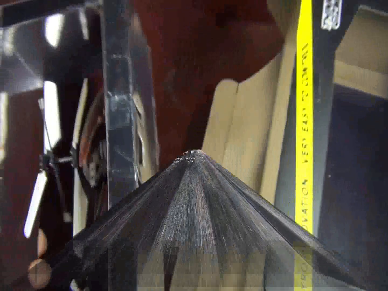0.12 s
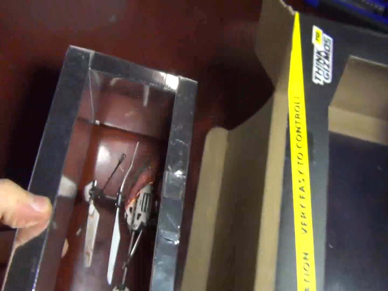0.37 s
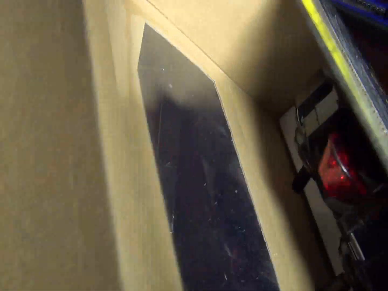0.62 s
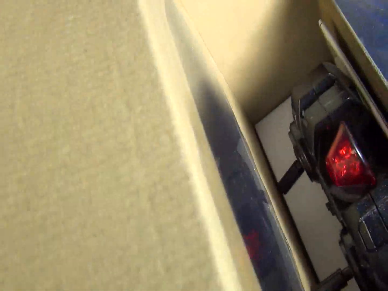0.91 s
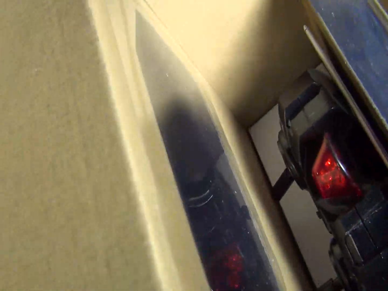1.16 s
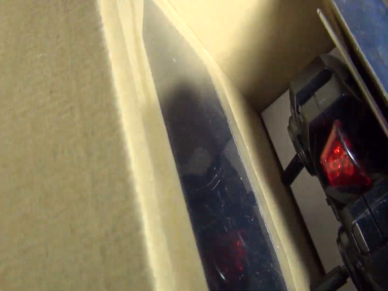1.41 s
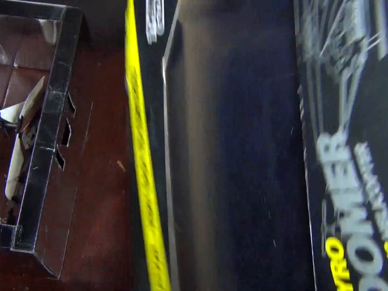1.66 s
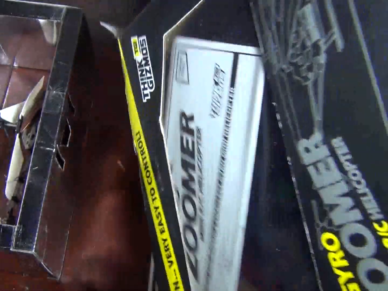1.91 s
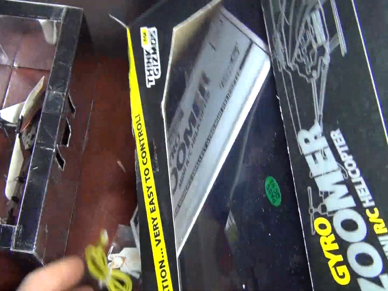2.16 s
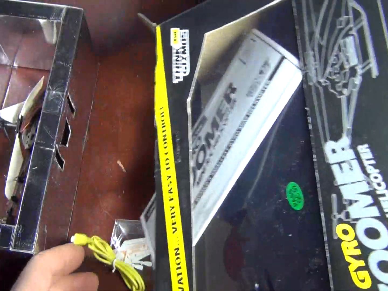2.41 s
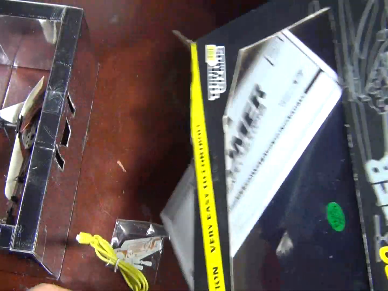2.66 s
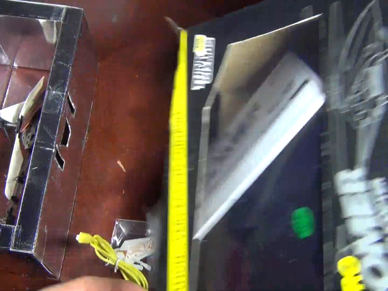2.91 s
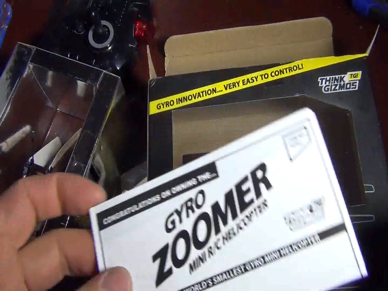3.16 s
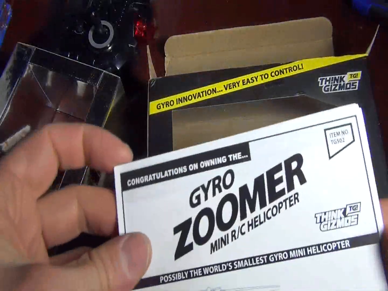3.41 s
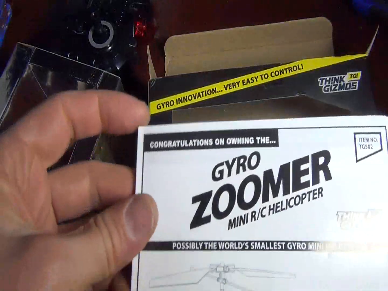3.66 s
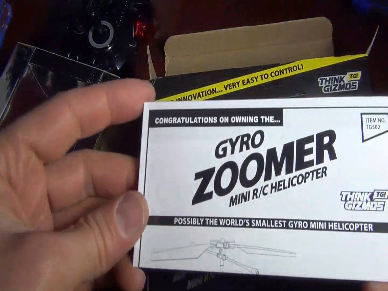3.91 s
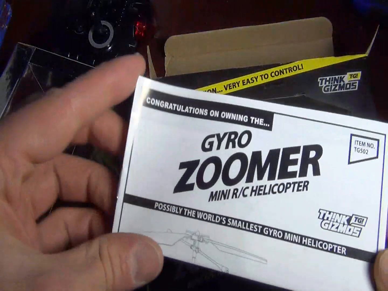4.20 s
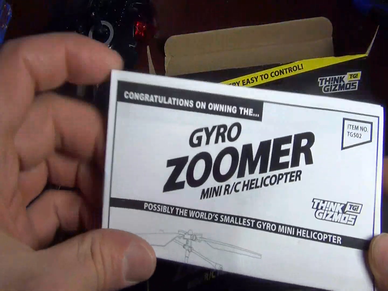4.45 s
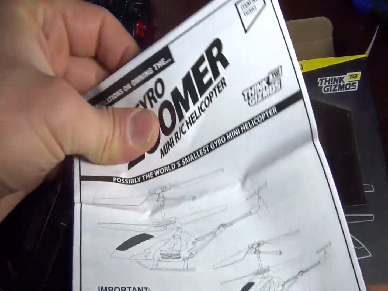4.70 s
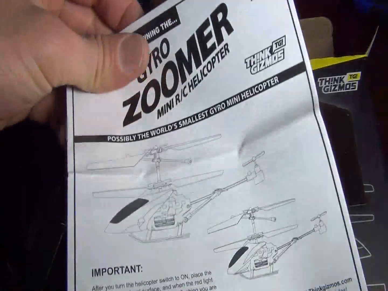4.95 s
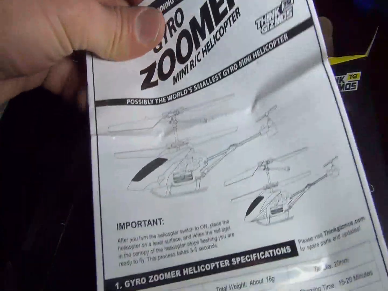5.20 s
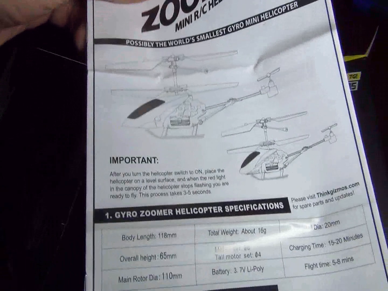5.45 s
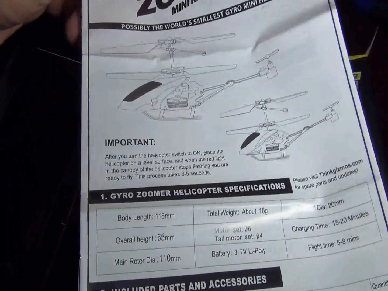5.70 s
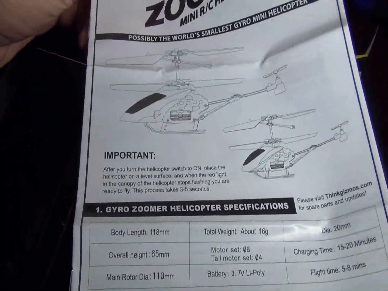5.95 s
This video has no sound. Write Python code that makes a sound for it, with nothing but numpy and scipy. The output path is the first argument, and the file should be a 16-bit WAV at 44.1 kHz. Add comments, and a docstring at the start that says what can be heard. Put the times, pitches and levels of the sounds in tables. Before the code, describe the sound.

A quiet indoor room with faint air and fan noise. Very near, cardboard rubs grittily and knocks hollowly, pauses, then is jolted hard with plastic snapping and crackling. After scattered bumps the handling nearly stops, leaving faint rapid ticks from the camera's focus motor. Finally thin paper clicks and crinkles as it is opened, with a hissy slide and a few light knocks, then settles almost to silence.

```python
"""A soft rub of cardboard comes first, over a quiet room with a faint fan; then the box is knocked about.
Hands turn a cardboard box with a clear plastic insert, tip out a paper leaflet and unfold it, close by.
Rubs are gritty noise through box panels, a scraping edge and surface hiss; knocks are struck resonances.
Folds, plastic snaps and paper ticks are clicks with a dying scatter; a camera's focus motor ticks under it."""
import sys
import numpy as np
from scipy import signal
from scipy.fft import next_fast_len
from scipy.io import wavfile
from scipy.ndimage import uniform_filter1d

SR = 44100
rng = np.random.default_rng(int(sys.argv[2]) if len(sys.argv) > 2 else 0)


def natural_amplitude(level_db):
    """Convert a level in decibels to a linear amplitude factor, elementwise."""
    exponent = np.asarray(level_db, float) / 20
    return 10 ** exponent


def master(y):
    """Save y as 16-bit WAV."""
    cut = np.clip(np.atleast_2d(y).T, -1, 1)
    pcm = np.round(cut * 32767)  # scale
    wavfile.write(sys.argv[1], SR, pcm.astype(np.int16))


N = 268392  # length [samples]

# slow sliding contact, tilt from box rumble (-) to surface hiss (+): (time [s], pressure [dB], tilt [dB])
SLIDES = [(0, -64.5, -14.5), (0.17, -69, 0.5), (0.42, -64, -5.5), (0.5, -78.5, 6), (1.02, -73.5, -6.5),
          (1.2, -61, -2), (1.62, -71, -1.5), (1.845, -49, -8), (1.96, -50.5, -4.5), (2.11, -59.5, 4),
          (2.26, -62, -4), (2.54, -71, 0.5), (3.1, -81, 1.3), (3.951, -79.5, 8), (4.4, -82, 1),
          (4.74, -59.5, 7), (5.0, -56.5, 3.5), (5.3, -66.5, 8), (5.75, -80.5, -0.5), (6.09, -68.5, 0)]
# strokes that swell and fade: (time [s], length [s], pressure [dB], tilt [dB], pitch of the dragged edge [Hz])
STROKES = [(0, 0.034, -70.5, -18.5, 800), (.036, 0.06, -49.5, 2.5, 3120), (.245, 0.026, -62.5, 1, 2980),
           (.286, 0.036, -49, 2.5, 2140), (.74, 0.089, -68.5, -7.5, 1370), (1.268, 0.092, -55.5, 0, 880),
           (1.382, 0.087, -55.5, -2, 2660), (1.705, 0.051, -47, -3.5, 1740), (1.737, 0.078, -50, -19, 1660),
           (1.979, 0.07, -44, -2, 2520), (2.91, 0.061, -53, -7, 1620), (2.955, 0.11, -49, 1, 3950),
           (3.057, .036, -62, -17.5, 820), (3.408, 0.054, -77, 12, 2040), (3.594, 0.057, -71, 3.5, 5150),
           (4.42, 0.13, -66, 11.5, 5180), (5.532, 0.046, -64.5, 4.5, 4630), (5.583, 0.049, -60, 6.5, 1990)]
# jerks that break loose at once and die away: (time [s], length [s], pressure [dB], tilt [dB], edge pitch [Hz])
JERKS = [(.091, 0.043, -55, 0, 1310), (.34, 0.055, -48, -10, 883), (.454, 0.011, -50, -7.5, 980),
         (.541, 0.26, -68.5, -7, 820), (1.047, .079, -60, -3.5, 865), (1.639, 0.07, -58.5, -1.5, 840),
         (1.873, 0.071, -59.5, -18, 830), (1.93, 0.018, -58, -11, 2600), (2.168, 0.058, -52.5, 7, 2200),
         (2.303, 0.05, -53, -5, 4660), (2.563, 0.23, -68, -10, 4700), (2.718, 0.08, -70, 0, 2270),
         (4.497, 0.048, -58, -6, 2480), (4.638, 0.074, -63.5, -12, 2050), (4.859, 0.11, -57, 5, 2300)]
# light brushes of skin, hiss only: (time [s], length [s], level [dB])
BRUSHES = [(2.049, .038, -40), (2.363, 0.053, -57), (2.673, 0.044, -54.5), (3.712, 0.13, -55),
           (4.239, 0.05, -63.5), (5.23, 0.19, -63)]
# resonances of the cardboard panels: (frequency [Hz], width [Hz], level [dB])
PANELS = [(95, 13, -1), (161.6, 70, 7), (222, 20.4, 9.5), (261.7, 27, 9), (350.6, 130, 11.5),
          (480, 27.6, 10), (635, 71, -13), (920, 140, -37)]
# spectrum shape of the scraping edge: (frequency [Hz], level [dB])
SCRAPE_COLOUR = [(290, -21.5), (500, 4), (943, 4.5), (1410, 2), (4170, -2), (6000, -0.5), (7800, -58.5)]
# spectrum shape of the fine surface grain: (frequency [Hz], level [dB])
HISS_COLOUR = [(2060, -33.5), (3500, -3.5), (5690, -1), (6560, -3), (9130, 3), (10400, 4.5), (14600, -14),
               (15200, -29), (15500, -27.5)]
# spectrum shape of the room air: (frequency [Hz], level [dB])
ROOM_COLOUR = [(15, -44), (25, -14), (53, 2), (101, -11.5), (582, -12), (703, -20), (919, -14),
               (1620, -16.5), (14300, -21.5), (15500, -28)]
# left-right likeness of the room air: (frequency [Hz], likeness [0-1])
ROOM_LIKENESS = [(60, 0.58), (400, 0.9), (1500, 1)]
# fuzzy tones of the fan: (frequency [Hz], width of each filter pass [Hz], rms level [dB])
FAN_TONES = [(141.4, 46, -84), (909, 29, -79.5), (1077, 82, -78.5)]
# bumps on the cardboard, and low thumps of air pushed by the paper near 4.2, 4.5 and 5.19 s: (time [s], peak
# level [dB], pitch of the struck panel or thump [Hz], decay setting [s])
KNOCKS = [(0.0993, -37, 810, 0.26), (0.292, -39, 285, 0.32), (0.311, -32, 228, 0.24),
          (0.3431, -30, 510, 0.031), (0.4532, -40, 1020, 0.027), (0.5501, -37, 670, 0.19),
          (0.6213, -46, 616, 0.22), (0.6885, -42, 480.0, 0.036), (0.801, -50, 290, 0.059),
          (0.892, -48, 257, 0.094), (0.967, -45, 746, 0.17), (1.069, -33, 676, 0.15),
          (1.081, -30.5, 757, 0.17), (1.267, -32.5, 1030, 0.23), (1.6352, -31, 692, 0.18),
          (1.7453, -26, 920, 0.26), (1.76, -37, 265, 0.068), (1.828, -22, 380, 0.061),
          (1.843, -20, 326, 0.039), (1.893, -25, 500, 0.033), (1.966, -50, 382, 0.039),
          (1.993, -31, 434, 0.11), (2.2994, -38, 653, 0.32), (2.573, -41.5, 245, 0.03),
          (2.9359, -36, 346, 0.084), (2.999, -38.5, 302, 0.042), (3.0201, -30.5, 260, 0.12),
          (3.0669, -34.5, 720, 0.044), (4.196, -48, 532, 0.083), (4.197, -59.5, 95, 0.021),
          (4.502, -51.5, 103, 0.072), (4.506, -42, 474, 0.092), (4.638, -44, 394, 0.026),
          (4.7639, -48, 338, 0.046), (4.8859, -38, 504, 0.11), (4.9303, -29, 920, 0.051),
          (5.0482, -43, 850, 0.053), (5.187, -57, 129, 0.061)]
# dull buckles of thick folds: (time [s], level [dB], pitch of the crease [Hz], decay setting [s])
FOLDS = [(.2915, -32.5, 2020, 0.012), (0.3449, -25, 1370, 0.017), (0.5513, -41, 1010, 0.048),
         (.622, -42.5, 2850, 0.04), (.6879, -43, 930, 0.017), (0.8926, -43.5, 1510, 0.048),
         (1.7394, -23.5, 1460, 0.23), (1.8298, -24.5, 1210, 0.038), (1.8849, -24, 1220, 0.05),
         (1.9321, -24, 2600, 0.071), (2.2831, -32, 2160, 0.049), (2.3008, -21, 4700, 0.024),
         (4.5083, -33.5, 2350, 0.07), (4.8865, -23.5, 1470, 0.023), (4.931, -25, 1290, .01)]
# bright snaps of the plastic: (time [s], level [dB], pitch of the crease [Hz], decay setting [s])
SNAPS = [(0.3029, -21.5, 2060, 0.012), (.362, -38, 4000, 0.0093), (.801, -48, 1510, 0.035),
         (1.9858, -23, 2450, 0.2), (2.0476, -22.5, 2980, 0.022), (2.0624, -24, 4500, .014),
         (2.1247, -22, 5250, 0.018), (2.1473, -26, 3400, 0.078), (2.1652, -22.5, 2600, 0.032),
         (2.3796, -28.5, 6000, 0.041), (2.963, -36, 5500, 0.28)]
# dry ticks of the paper: (time [s], level [dB], pitch of the crease [Hz])
TICKS = [(.911, -50, 4000), (.961, -44, 3500), (3.3036, -37.5, 4850), (3.4294, -34.5, 4700),
         (3.4398, -34.5, 1890), (3.9193, -42.5, 2170), (4.1907, -35.5, 5170), (4.1968, -28, 4700),
         (4.4217, -35.5, 4650), (4.6391, -28, 1310), (4.6584, -28.5, 1300), (4.666, -30, 2000),
         (4.6771, -33.5, 1010), (4.7842, -24.5, 2940), (5.0496, -38.5, 5360), (5.053, -29, 1190),
         (5.1846, -33.5, 3000)]
# runs of focus motor steps: (first step [s], end [s], level [dB], every second step, relative level [dB])
MOTOR_RUNS = [(.8143, 1.03, -66, -6), (2.4258, 3.09, -64, 0), (3.1052, 6.09, -69, -8)]
# resonances of the lens barrel: (frequency [Hz], width of each filter pass [Hz], level [dB])
LENS_BARREL = [(4480, 200, -4), (3040, 280, -16)]
# stereo lean of the near sources: (frequency [Hz], left minus right [dB])
LEAN = [(60, 7), (150, 3), (300, 0), (600, -2), (2500, 0)]
# the part that reaches the two microphone ports with opposite sign: (frequency [Hz], gain [dB])
UNLIKE_GAIN = [(100, -41.5), (500, -17.5), (2000, -17.5), (4600, -24.5), (6200, -10), (9600, -10.5),
               (10800, -24), (15000, -19)]
# dip of the microphone housing and its top edge: (frequency [Hz], gain [dB])
MIC_RESPONSE = [(5700, 1), (6700, -5), (8000, -2), (14600, -1.5), (15600, -12.5)]


def evened(x):
    """Scales to rms 1."""
    return x / np.sqrt(np.mean(x ** 2) + 1e-20)


def read(points, hz):
    """Reads a table on a log-frequency axis."""
    f, value = np.transpose(points)
    return np.interp(np.log(hz + 1), np.log(f + 1), value)


def coloured(x, points):
    """Minimum-phase filter with the given spectrum in dB, so nothing sounds ahead of its cause."""
    db = np.maximum(read(points, abs(np.fft.fftfreq(4096, 1 / SR))), -100)
    # the Hilbert transform of the log gain gives the matching phase
    log_response = np.conj(signal.hilbert(np.log(natural_amplitude(db))))
    taps = np.fft.ifft(np.exp(log_response)).real[:2048]
    return signal.oaconvolve(x, taps)[:len(x)]


def resonate(x, hz, width):
    """Two-pole resonance of peak gain 1."""
    return signal.lfilter(*signal.iirpeak(hz, hz / width, SR), x)


def resonate_twice(x, hz, width):
    """Two equal resonances in a row, for steeper skirts."""
    return resonate(resonate(x, hz, width), hz, width)


def add(mix, s, sound):
    """Mixes a sound in at time s."""
    part = mix[round(s * SR):][:len(sound)]
    part += sound[:len(part)]


def noise_tail(x, size, t60, gap_s=-1):
    """Smears x with decaying noise of unit energy that starts after the gap."""
    t = np.arange(size) / SR
    taps = rng.standard_normal(size) * natural_amplitude(-60 * t / t60) * (t > gap_s)
    return signal.oaconvolve(x, taps / np.linalg.norm(taps))[:N]


def panels(x, near_hz=300, octaves=9):
    """The cardboard panels ring, favouring those tuned near the place of contact."""
    out = 0
    for hz, width, db in PANELS:
        distance = np.log2(hz / near_hz) / octaves
        out = out + natural_amplitude(db - 14.5 * distance ** 2) * resonate(x, hz, width)
    return out


def grit(size, per_s, spread_db, smooth):
    """Stick-slip noise: sparse slips of uneven size over a share of smooth noise."""
    sizes = natural_amplitude(spread_db * np.minimum(rng.exponential(1, size), 4))
    slips = (rng.random(size) < per_s / SR) * sizes
    bursts = evened(signal.lfilter([1], [1, -.96], slips))
    return rng.standard_normal(size) * (smooth + bursts)


def shifting(x, depth_db):
    """The touched spot moves, so patches of the spectrum swell and fade."""
    z = signal.stft(x, nperseg=512, noverlap=384)[2]
    patches = uniform_filter1d(rng.standard_normal(z.shape), 5, 0)  # across frequency
    patches = uniform_filter1d(patches, 12, 1)  # across time
    return signal.istft(z * natural_amplitude(depth_db * evened(patches)), nperseg=512, noverlap=384)[1][:len(x)]


def lumps(per_s, depth_db):
    """Pressure under the fingers wanders quickly."""
    steps = rng.standard_normal(int(N / SR * per_s) + 2)
    return natural_amplitude(depth_db * np.interp(np.arange(N) * per_s / SR, np.arange(len(steps)), steps))


def swell(start, length, top):
    """Samples and curved rise and fall of a stroke, with its top at the given place (0-1)."""
    span = slice(round(start * SR), round((start + length) * SR))
    u = np.linspace(0, 1, span.stop - span.start)
    rise = np.minimum(u / top, 1) ** 0.72
    fall = (1 - np.maximum(u - top, 0) / (1 - top)) ** 0.83
    return span, rise * fall


def rubbing():
    """Stick-slip grit drives the box walls, the scraping edge and the fine surface grain."""
    contact = shifting(grit(N, 1200, 2.5, 1.5), 2.3)
    walls = evened(panels(contact) * lumps(60, 2))
    edge = evened(coloured(contact, SCRAPE_COLOUR) * lumps(70, 1.2))
    grain = evened(coloured(contact, HISS_COLOUR))
    skin = evened(resonate(grain, 9800, 7400))

    s, *columns = np.transpose(SLIDES)
    db, tilt_db = (np.interp(np.arange(N) / SR, s, c) for c in columns)
    scrape_db = -64 + 0.82 * (db + 63.5)  # the scrape follows the pressure less than fully
    out = natural_amplitude(db - tilt_db) * walls + natural_amplitude(db + tilt_db) * grain
    out += natural_amplitude(scrape_db) * edge

    for rows, top in ((STROKES, 0.51), (JERKS, 0.099)):
        for start, length, db, tilt_db, hz in rows:
            span, shape = swell(start, length, top)
            singing = evened(resonate_twice(contact[span], hz, 0.31 * hz))  # the dragged edge sings
            scrape = 0.6 * edge[span] + 0.65 * singing
            layers = natural_amplitude(-tilt_db) * walls[span] + natural_amplitude(tilt_db) * grain[span]
            layers += natural_amplitude(3.5) * scrape
            add(out, start, natural_amplitude(db) * shape * layers)

    for start, length, db in BRUSHES:
        span, shape = swell(start, length, 0.35)
        add(out, start, natural_amplitude(db) * shape * skin[span])
    return out


def room():
    """Steady stereo air noise with faint patches, and the fuzzy tones of a fan."""
    frames, hz = N // 256 + 5, np.fft.rfftfreq(1024, 1 / SR)
    a, b, c, d, patches = rng.standard_normal((frames, 513, 5)).T
    patches = evened(uniform_filter1d(uniform_filter1d(patches, 12, 0), 14, 1))
    same = np.clip(read(ROOM_LIKENESS, hz), -1, 1)[:, None]
    left = a + 1j * b
    right = same * left + np.sqrt(1 - same ** 2) * (c + 1j * d)
    z = np.array([left, right]) * natural_amplitude(read(ROOM_COLOUR, hz)[:, None] + 0.51 * patches)
    air = natural_amplitude(-70) * evened(signal.istft(z, nperseg=1024, noverlap=768)[1][:, :N])
    blades = rng.standard_normal(N)
    fan = sum(natural_amplitude(db) * evened(resonate_twice(blades, f, w)) for f, w, db in FAN_TONES)
    return air + fan


def knocks():
    """A blow with a rough follow-through sets the nearest panels ringing."""
    out, t = np.zeros(N), np.arange(6000) / SR
    for s, db, hz, t60 in KNOCKS:
        decay = np.clip(t60, .01, .2)
        blow = np.exp(-(4 * hz * t - 1.5) ** 2)
        push = blow + .4 * rng.standard_normal(len(t)) * natural_amplitude(-60 * t / decay)
        ring = resonate(panels(push, hz, 0.99), hz, 5.4 * hz)
        ring += 16 * resonate(push, hz, hz / 5)  # the struck panel itself
        ring *= natural_amplitude(-30 * t / decay)  # damped further
        add(out, s, natural_amplitude(db) * ring / abs(ring).max())
    return out


def echo(x):
    """A short soft tail from table and walls."""
    return natural_amplitude(-17) * noise_tail(x, 9000, t60=0.24, gap_s=.003)


def snaps():
    """A crease buckles: one sharp click, then a dying scatter that rings the crease and the treble."""
    # per kind: treble at 2 kHz [dB], broad share, strength of the click
    fold, snap, tick = (-16.5, 0.13, 3), (-3.5, 0.28, 1.03), (-4.5, 0.98, 4.1)
    rows = [(*row, fold) for row in FOLDS] + [(*row, snap) for row in SNAPS]
    rows += [(*row, 0.01, tick) for row in TICKS]  # all ticks share one decay [s]
    out, t = np.zeros(N), np.arange(5000) / SR
    for s, db, hz, t60, (treble_db, broad, click) in rows:
        scatter = rng.standard_normal(len(t)) * natural_amplitude(-60 * t / np.clip(t60, .003, .2))
        burst = scatter * np.minimum(t / 0.00013, 1)
        burst[round(.0004 * SR)] += click
        crease = resonate(burst, hz, .4 * hz) + broad * resonate(burst, 1600, 4000)
        bright = coloured(resonate(burst, 8900, 4900), HISS_COLOUR)
        # higher creases are brighter, by 0.5 dB per octave
        share = np.clip(natural_amplitude(treble_db + 0.5 * np.log2(hz / 2000)), 0, .9)
        sound = np.sqrt(1 - share ** 2) * crease / abs(crease).max()
        sound += share * bright / abs(bright).max()
        add(out, s, natural_amplitude(db) * sound)
    return out


def focus_motor():
    """The motor steps 50 times a second; each step rings the lens barrel for a few milliseconds."""
    clicks = np.zeros(N)
    for first, end, db, second_db in MOTOR_RUNS:
        at = np.arange(first, end, 1 / 50)
        uneven_db = second_db * (np.arange(len(at)) % 2) + 2 * rng.standard_normal(len(at))
        clicks[(at * SR).astype(int)] = natural_amplitude(db + uneven_db)
    # SR / (2 * width) makes up for the little energy a single click puts into a narrow band
    return sum(natural_amplitude(db) * SR / (2 * width) * resonate_twice(clicks, hz, width)
               for hz, width, db in LENS_BARREL)


def ports(near, far):
    """Two microphone ports lean by frequency; a phase step and reflections reach them with opposite sign."""
    both = near + far.mean(0)
    scatter = noise_tail(both, 2600, t60=.05)
    turned = signal.hilbert(both, next_fast_len(N)).imag[:N]  # quarter-cycle phase step
    unlike = coloured(.6 * turned + .8 * scatter, UNLIKE_GAIN)
    left, right = (coloured(near, [(hz, side * db / 2) for hz, db in LEAN]) for side in (1, -1))
    return far + np.array([left + unlike, right - unlike])


def scene():
    """Handling close by, over the room and the focus motor."""
    hits = knocks() + snaps()
    return ports(rubbing() + hits + echo(hits), room() + focus_motor())


def top_cut(x):
    """Nothing passes above the cut-off."""
    return signal.sosfilt(signal.butter(12, 16340, fs=SR, output="sos"), x)


def record(dry):
    """The microphone dips in the low treble and loses the deepest bass and the top."""
    band = signal.butter(2, [40, 14500], "band", fs=SR, output="sos")
    heard = np.array([coloured(x, MIC_RESPONSE) for x in signal.sosfilt(band, dry)])
    return top_cut(heard)


dry = scene()
out = record(dry)
master(out)
```